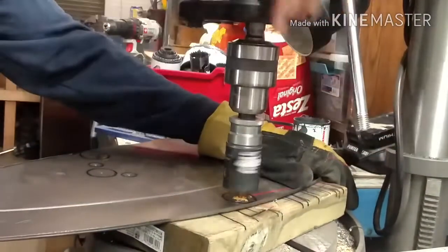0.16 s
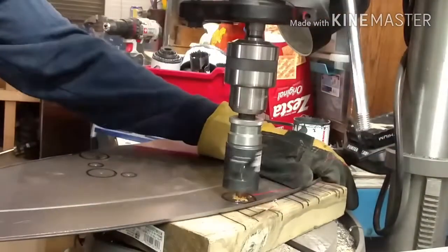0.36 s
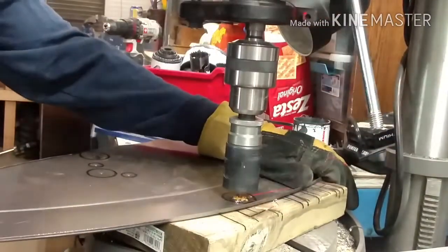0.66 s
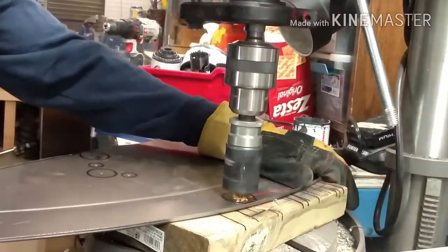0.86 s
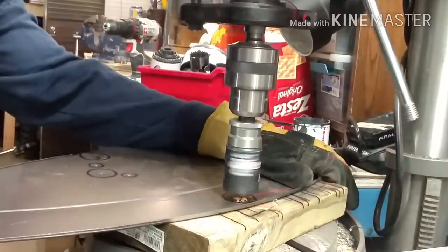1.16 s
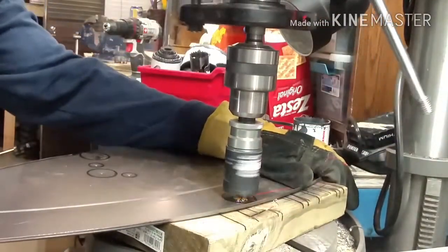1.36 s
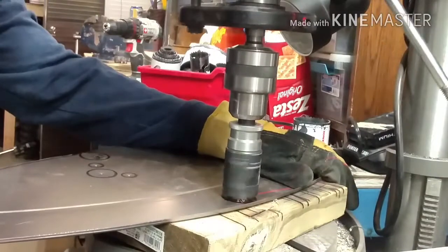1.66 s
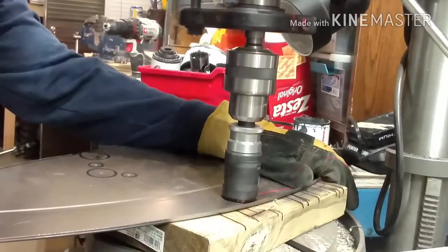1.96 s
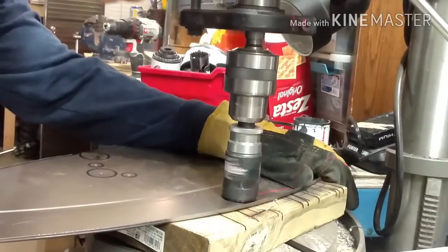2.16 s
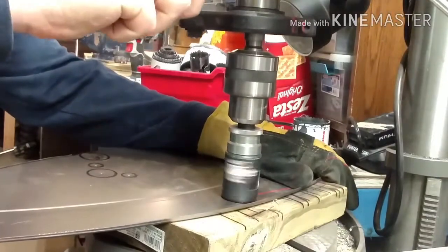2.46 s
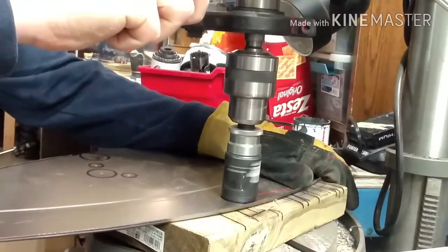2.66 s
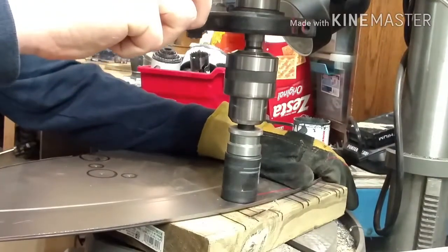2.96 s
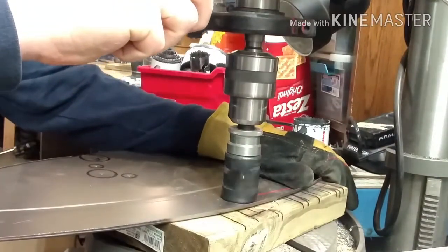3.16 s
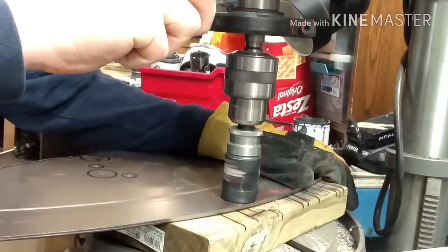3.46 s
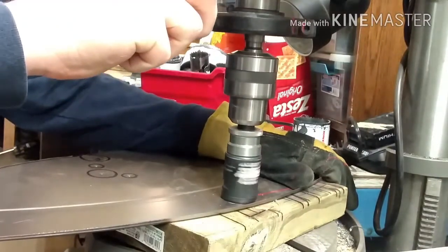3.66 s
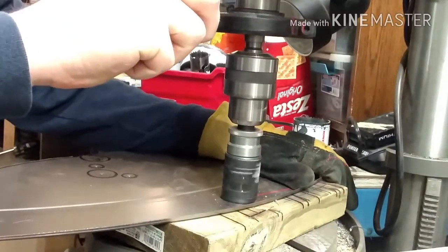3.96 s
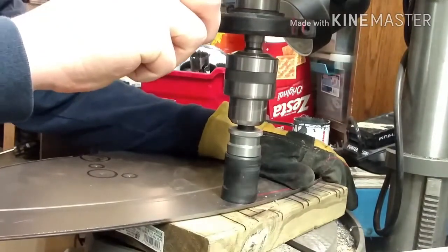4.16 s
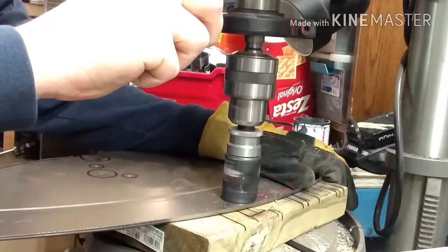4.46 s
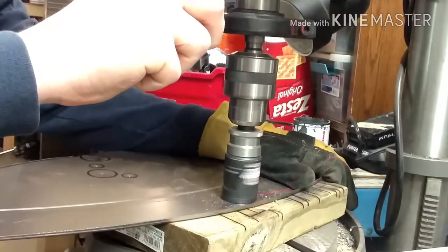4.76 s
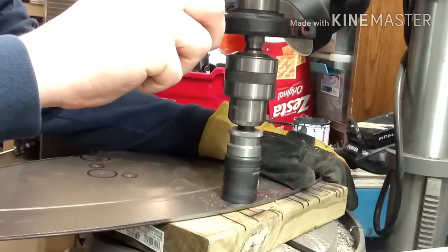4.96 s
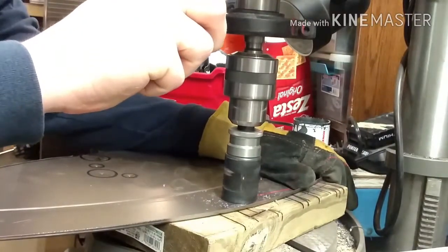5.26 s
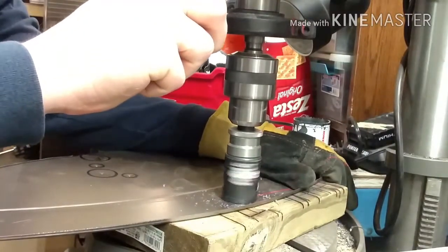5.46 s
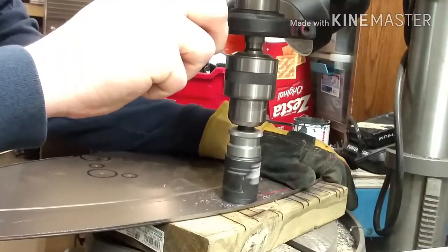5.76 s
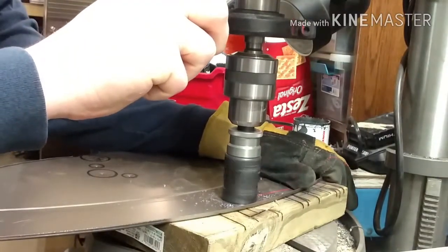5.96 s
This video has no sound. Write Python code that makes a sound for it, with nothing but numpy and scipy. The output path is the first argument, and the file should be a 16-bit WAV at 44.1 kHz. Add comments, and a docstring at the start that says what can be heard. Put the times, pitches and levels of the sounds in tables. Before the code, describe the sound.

Steady machine noise from start to end: a buzzing motor hum, the steel sheet rattling on its block, and irregular light knocks about thirty times a second, some harder. From around three seconds the teeth rub the steel with subtle rasps and tiny chip clicks. Soon after four seconds a tooth snags with a crisp metallic clack. Heard close on a phone in a small cluttered room.

```python
"""Small workshop: a drill press runs while a hole saw is fed onto a steel sheet, a phone close by.
Each motor turn shakes frame and sheet: a drone of shaft orders (sines) with loose clatter between (noise blows).
Slack drive parts chatter and tick in step with the turns: filtered noise bursts with short tails.
Saw teeth scrape and skid (noise strokes), chips snap, and once a tooth catches: a clack and a bright ring."""
import sys
import numpy as np
from scipy import signal
from scipy.fft import rfft, irfft
from scipy.io import wavfile
from scipy.ndimage import uniform_filter1d

SR = 44100
rng = np.random.default_rng(int(sys.argv[2]) if len(sys.argv) > 2 else 0)


def bounce(signal):
    """Save signal as a 16-bit WAV file at the path given by the first command-line argument."""
    frames = np.transpose(np.atleast_2d(signal))
    limited = np.clip(frames, -1, 1)
    pcm = np.round(limited * 32767).astype(np.int16)
    wavfile.write(sys.argv[1], SR, pcm)


N = 269451
TIME_S = np.arange(N) / SR
FREQ_HZ = np.maximum(np.arange(N + 1) * SR / (2 * N), 1)

# Shaft orders of the drone. Each row: multiple of the motor speed, relative level in dB with the
# sheet free, the same with it pinned.
ORDERS = [(2, -61.0, -63.0), (4, -49.5, -54.0), (5, -56.5, -56.0), (7, -44.5, -47.5), (9, -43.5, -42.5),
          (10, -35.5, -39.0), (11, -44.0, -43.0), (12, -46.0, -47.5), (13, -40.0, -43.5),
          (14, -41.5, -37.0), (15, -39.5, -43.5), (18, -41.5, -43.0), (19, -42.5, -41.5),
          (20, -38.0, -42.0), (21, -42.0, -48.5), (22, -39.5, -44.0), (23, -39.5, -40.5),
          (24, -41.5, -42.0), (25, -28.0, -34.0), (26, -32.5, -27.5), (27, -29.5, -33.5),
          (28, -38.5, -36.5), (29, -33.5, -29.0), (30, -37.0, -33.5), (31, -29.5, -29.0),
          (32, -36.5, -33.0), (33, -38.0, -38.5), (34, -42.5, -36.5), (35, -34.5, -42.0),
          (36, -29.0, -31.5), (37, -36.5, -38.0), (38, -37.0, -37.5), (39, -39.0, -42.0),
          (40, -39.5, -42.5), (41, -46.5, -45.5), (43, -40.5, -39.0), (44, -44.0, -44.5),
          (45, -44.0, -47.0), (46, -50.0, -51.0), (49, -51.0, -45.0)]
# Orders that swell with the slip beat. Each row: order, depth when free (0-1), depth when pinned (0-1),
# time of a crest in seconds.
ORDER_BEATS = [(4, 0.9, 0.05, 0.42), (14, 0.37, 0.32, 0.47), (15, 0.59, 0.59, 0.25), (20, 0.75, 0.45, 0.12),
               (22, 0.0, 0.9, 0.35), (23, 0.63, 0.12, 0.11), (25, 0.07, 0.66, 0.09), (27, 0.45, 0.0, 0.01),
               (30, 0.43, 0.11, 0.39), (31, 0.53, 0.02, 0.16), (32, 0.2, 0.24, 0.4), (33, 0.57, 0.36, 0.51),
               (34, 0.53, 0.0, 0.88), (36, 0.36, 0.37, 0.44), (37, 0.17, 0.44, 0.47),
               (39, 0.19, 0.36, 0.64), (43, 0.53, 0.16, 0.58)]
# Two orders on the frame's main resonance. Each row: time in seconds, 16th order in dB, 17th order in dB.
BOOM_LEVEL = [(0.0, -23.5, -34), (0.5, -19, -29.5), (0.8, -20.5, -27.5), (1.2, -21.7, -31.5),
              (2.0, -22, -26.5), (2.35, -20.7, -27.5), (2.67, -24, -27), (2.9, -22, -26), (3.3, -24.5, -24),
              (3.76, -22.7, -24.5), (4.25, -22, -22), (4.38, -29.5, -27.5), (4.66, -23, -35),
              (4.99, -26.5, -23.5), (5.16, -23.5, -23.5), (5.47, -26, -28.5), (5.75, -20, -28.5),
              (6.11, -25.5, -28.5)]
# Motor slows a little as the teeth take hold. Each row: time in seconds, loss of speed in turns per second.
SPEED_LOSS = [(0, -.018), (2.85, -.018), (3, .01), (3.55, .02), (3.95, .076), (4.15, .065), (4.3, .028),
              (4.45, .03), (4.8, -.022), (6.11, -.008)]
# Saw is fed down and pins the sheet. Each row: time in seconds, pressure (0-1).
PRESSURE = [(0, 0), (2.1, 0), (3.1, .9), (4.4, 1), (4.9, .7), (6.11, .65)]
# Shaking of the sheet, damped while the teeth bite hardest. Each row: time in seconds, relative level in dB.
SHEET_LEVEL = [(0, -20), (1.15, -20.5), (1.55, -22.5), (2.25, -21), (2.5, -21), (2.9, -20), (3.03, -20),
               (3.075, -23), (3.12, -21), (3.68, -19.5), (3.74, -24), (3.8, -21.5), (4.27, -19.5),
               (4.36, -22), (4.65, -21), (4.95, -20.5), (5.06, -17), (5.18, -20.5), (5.3, -19.5),
               (6.11, -21)]
# Broad response of the sheet. Each row: frequency in Hz, relative dB per Hz.
SHEET_RESPONSE = [(25, -37), (90, -29.5), (170, -14.5), (225, -11.5), (280, 0.5), (340, -6.5), (430, -3.5),
                  (500, 0), (550, -3.5), (700, -3), (800, 3.5), (1150, -3), (1420, -8.5), (1900, -37.5),
                  (4000, -88)]
# Resonances of frame and table in the clatter. Each row: centre in Hz, width in Hz, dB over the broad response.
FRAME_RING = [(205, 4, 11), (282, 14, 6), (485, 12, 9), (603, 7, 9)]
# Broad response of the drive. Each row: frequency in Hz, relative dB per Hz.
DRIVE_RESPONSE = [(1200, -8.5), (2600, -13), (3400, 5.5), (4200, -8.5), (5300, 2), (6300, -13.5),
                  (7500, -2.5), (9000, -6.5), (10200, -2.5), (11300, -3.5), (12800, -9.5), (15500, -10)]
# Resonances of chuck and pulleys. Each row: centre in Hz, width in Hz, dB over the broad response.
CHUCK_RING = [(2050, 48, 18), (2730, 180, 26.5), (3220, 50, 0.5), (3800, 260, 5), (4420, 260, 10),
              (4760, 190, 11), (5670, 270, 4), (6780, 120, 8), (8430, 1050, 5), (9370, 140, -2),
              (10700, 170, 8.5), (13900, 220, 6)]
# Narrow modes of saw and chuck. Each row: centre in Hz, width in Hz, dB over the broad response.
STEEL_MODES = [(3285, 22, 7), (3410, 25, 7), (3725, 25, 6), (3870, 30, 5), (3965, 22, 5), (4770, 30, 4),
               (6830, 30, 4), (8450, 30, 6), (8860, 40, 5), (9400, 30, 6)]
# Broad response of the scraping teeth. Each row: frequency in Hz, relative dB per Hz.
TEETH_RESPONSE = [(700, -16), (1400, -2.5), (1750, 3.5), (2000, -2), (2200, -3.5), (2500, -10.5), (3200, 1),
                  (4200, -35.5), (6500, -16), (15000, -63)]
# Rasp of the teeth. Each row: time in seconds, relative level in dB.
RASP_LEVEL = [(0, -40.5), (1.1, -41), (2.4, -44), (2.9, -39.5), (3.4, -44), (3.85, -42), (4.2, -43),
              (4.7, -43.5), (5.1, -40), (5.4, -39.5), (5.7, -43.5), (6.11, -44)]
# Saw resonances struck by chips. Each row: centre in Hz, width in Hz, relative peak gain in dB.
CHIP_RING = [(3000, 800, -2), (3800, 700, -3), (4400, 700, -3)]
# Hardest knocks of the slack drive. Each row: time in seconds, relative body level in dB, relative treble level in dB.
HARD_KNOCKS = [(0.027, -26.5, -32), (0.1608, -28, -28.5), (0.193, -30, -35), (0.295, -26.5, -37),
               (0.497, -24.5, -30), (0.5995, -26, -32), (0.665, -28, -34), (0.8322, -28, -34),
               (1.0015, -34, -36), (1.034, -28, -37), (1.1352, -22, -29), (1.2705, -37, -33.5),
               (1.3728, -37, -32), (1.4724, -34, -35), (1.574, -27.5, -28.5), (1.7415, -30, -35),
               (1.808, -26.5, -33), (1.9092, -25, -30.5), (1.944, -32, -32), (2.1116, -29, -33),
               (2.2118, -31, -38), (2.4134, -39, -30.5), (2.5144, -27, -29.5), (2.582, -30, -33),
               (2.615, -29, -38), (2.817, -27, -38), (3.053, -27, -35), (3.086, -27, -29.5),
               (3.221, -25.5, -31), (3.255, -24, -40), (3.3553, -31, -34), (3.524, -34, -38),
               (3.691, -21.5, -29), (3.928, -39, -38), (3.961, -33, -28), (4.0642, -29.5, -35),
               (4.131, -28, -34), (4.164, -24.5, -34), (4.1976, -25, -35), (4.2662, -26, -35),
               (4.534, -31, -34), (4.803, -40, -30), (4.838, -26, -39), (4.971, -29, -32),
               (5.106, -24.5, -34), (5.1404, -23, -37), (5.1726, -33, -29), (5.3418, -25, -28),
               (5.375, -24.5, -33), (5.477, -31, -28.5), (5.509, -29, -30), (5.644, -37, -37),
               (5.71, -27, -33), (5.7788, -29, -30), (5.845, -28, -34), (5.979, -36, -33.5),
               (6.0477, -24.5, -35)]
# Teeth skid on the steel. Each row: start in seconds, length in seconds, level in dB, centre in Hz.
SKIDS = [(2.85, .17, -38.5, 2450), (3.612, .05, -37, 1790), (4.205, .09, -36.5, 1790),
         (4.324, .085, -33.5, 1700), (4.42, .3, -37, 1620), (4.5, .04, -36, 1850),
         (4.665, .05, -36.5, 1720), (5.06, .1, -41, 2000)]
# A tooth catches. Each row: start in seconds, relative level in dB.
CATCHES = [(4.343, -21), (4.349, -24), (4.363, -29), (4.393, -35)]
# Modes of the saw cup. Each row: frequency in Hz, relative level in dB, 60 dB decay time in seconds.
CUP_MODES = [(1900, 7, .025), (3300, 6, .025), (4630, 6, .035), (4400, 5, .03), (6175, -12, .15),
             (8870, 1, .09), (9030, -1, .1), (11570, -18, .11), (12560, -11, .13)]
# Balance of the phone's two ports. Each row: frequency in Hz, left minus right in dB.
PORT_BALANCE = [(60, 3.5), (120, 4.5), (200, 3), (290, -2), (480, -4), (680, 2), (1290, -1), (2380, -7),
                (4400, -0.5), (8400, 10), (12000, 0.5)]

MOTOR_HZ, SPINDLE_HZ, BELT_HZ = 29.727, 6.195, 3.445  # nominal turns per second
SLIP_BEAT_HZ = 1.092  # motor slips against the mains: slow beat
SPINDLE_SLACK_S, BELT_SLACK_S = 0.027, 0.26  # a moment of most play
KNOCK_PHASE_TURNS, FRAME_SMEAR_TURNS = .78, .18  # place in the motor turn; scatter of frame orders
ORDER_WAVER, LOWER_WAVER, UPPER_WAVER = .18, .09, .24  # share: drone, 16th order, 17th order
DRONE_OFFSET_DB, CLATTER_OFFSET_DB, CLATTER_PINNED_DB = .5, -3.2, -.9
BUZZ_DB, FLUTTER_DB = 2.0, 1.1  # loose sheet: swell once a turn, random flutter
CHATTER_DB, CHATTER_LOAD_DB = -36.5, 0.6  # running free; rise at full pressure
RISE_S, CRACK_S, TOP_CRACK_S = .002, .0065, .009
BODY_TINT_HZ, TOP_TINT_HZ = (3100, 4900), (8000, 9800)  # range of each knock's own resonance
CROSS_LAG_SAMPLES, CROSS_SHARE = 17, .74  # phone's stereo widening
TOP_HZ = 15300


def undb(db):
    """Decibels to gain."""
    return 10 ** (np.asarray(db) / 20)


def unit(x):
    """Scale to rms 1."""
    return x / np.sqrt(np.mean(np.abs(x) ** 2))


def curves(table):
    """Each column of a table as a line through time."""
    time_s, *columns = np.transpose(table)
    return [np.interp(TIME_S, time_s, column) for column in columns]


def shape(points):
    """Response in dB: points joined on a log-frequency axis."""
    hz, db = np.transpose(points)
    return np.interp(np.log(FREQ_HZ), np.log(hz), db)


def peaks(table):
    """Resonances as dB over a broad response."""
    return sum(peak_db / (1 + (2 * (FREQ_HZ - hz) / width_hz) ** 2) for hz, width_hz, peak_db in table)


def colour(x, db):
    """Causal minimum-phase filter with the given gain at each frequency, by folding the cepstrum."""
    cepstrum = irfft(np.log(undb(db)))
    cepstrum[1:N] *= 2
    cepstrum[N + 1:] = 0
    response = np.exp(rfft(cepstrum))
    return irfft(rfft(x, 2 * N) * response)[..., :N]


def walk(rate_hz):
    """Smooth chance at rms 1, with about rate_hz new values a second."""
    knots = rng.standard_normal(int(N / SR * rate_hz) + 3)
    line = np.interp(TIME_S * rate_hz + rng.random(), np.arange(len(knots)), knots)
    return unit(uniform_filter1d(line, int(SR / rate_hz / 2)))


def spread(mid, side):
    """Left and right from mid and side."""
    return np.array([mid + side, mid - side])


def cycle(hz, crest_s):
    """Steady swing between -1 and 1."""
    return np.cos(2 * np.pi * hz * (TIME_S - crest_s))


def slip_beat(depth, crest_s):
    """Gain of two close tones that beat: broad crests and narrow dips."""
    return np.sqrt(1 + 2 * depth * cycle(SLIP_BEAT_HZ, crest_s) / (1 + depth ** 2))


def throb(turns, db, crest_turns):
    """Gain that swells once a motor turn, as the unbalance loads the cut."""
    return unit(undb(db * np.cos(2 * np.pi * (turns - crest_turns))))


def partial(turns, order, waver, waver_hz, side=0.4):
    """Shaft order, mid at rms 1, wavering in size and phase; low orders differ most between channels."""
    angle = 2 * np.pi * order * turns
    sine, cosine = np.sin(angle), np.cos(angle)
    tone = sine * (1 + waver * walk(waver_hz)) + cosine * waver * walk(waver_hz)
    tone /= np.sqrt(.5 + waver ** 2)
    return spread(tone, side * (.5 + 7 / order) * (-1) ** order * cosine)


def drone(turns, shake_db, pressure, waver_hz=11):
    """Low orders sound in the frame, upper ones whine in the sheet; pinning shifts them, some beat with the mains."""
    beat = {order: slip_beat(free + (pinned - free) * pressure, crest_s)
            for order, free, pinned, crest_s in ORDER_BEATS}
    flutter = unit(undb(FLUTTER_DB * (walk(16) + walk(110))))
    buzz = throb(turns, db=BUZZ_DB, crest_turns=0.61) * flutter
    out = np.zeros((2, N))
    for order, free_db, pinned_db in ORDERS:
        in_sheet = order > 22
        level_db = DRONE_OFFSET_DB + free_db + (pinned_db - free_db) * pressure
        gain = beat.get(order, 1)
        smear_turns = FRAME_SMEAR_TURNS
        if in_sheet:
            level_db = level_db + shake_db - shake_db.mean()
            gain = gain * buzz
            smear_turns = 1
        # one shove a turn keeps frame orders roughly in step; the sheet scatters the rest
        scatter = smear_turns * rng.standard_normal()
        shifted = turns - KNOCK_PHASE_TURNS + scatter / order
        out += undb(level_db) * gain * partial(shifted, order, ORDER_WAVER, waver_hz)
    return out


def boom(turns, waver_hz=16, crest_turns=.55):
    """Two orders on the frame's main resonance beat once a turn, each with its own level curve."""
    lower_db, upper_db = curves(BOOM_LEVEL)
    lower = partial(turns - crest_turns, order=16, waver=LOWER_WAVER, waver_hz=waver_hz)
    upper = partial(turns - crest_turns, order=17, waver=UPPER_WAVER, waver_hz=waver_hz)
    return undb(lower_db) * lower + undb(upper_db) * upper


def strokes(turns, count, fade, scatter_db):
    """Envelope of count uneven blows a turn; fade is the decay constant as a share of the slot."""
    slot = turns * count + 1
    size = undb(scatter_db * rng.standard_normal(int(slot.max()) + 1))
    return unit(size[slot.astype(int)] * np.exp(-(slot % 1) / fade))


def clatter(turns, shake_db, side=0.35, wide_hz=250, repeat=.17):
    """Sheet slaps on its block six times a turn, each turn partly like the last; the rumble is widest."""
    slaps = strokes(turns, count=6, fade=1.0, scatter_db=3.0) * rng.standard_normal((2, N))
    slaps = slaps + repeat * np.roll(slaps, round(SR / MOTOR_HZ), axis=1)
    mid = colour(slaps[0], shape(SHEET_RESPONSE) + peaks(FRAME_RING))
    wide = colour(slaps[1], shape(SHEET_RESPONSE) + 10 * np.log10(1 + (wide_hz / FREQ_HZ) ** 2))
    return undb(CLATTER_OFFSET_DB + shake_db) * spread(unit(mid), side * unit(wide))


def dense_modes(x, ring_s=0.0049, room_s=0.018, room_db=-7):
    """Countless small modes of the steel smear each impulse; the workshop answers: decaying noise."""
    age_s = TIME_S[:SR // 4]
    ring, room = np.exp(-age_s / ring_s), np.exp(-age_s / room_s)
    response = (unit(ring) + undb(room_db) * unit(room)) * rng.standard_normal((2, len(age_s)))
    return signal.fftconvolve(x, unit(response) / np.sqrt(len(age_s)), axes=1)[:, :N]


def steel():
    """Response of the drive's steel parts in dB, at unit power."""
    db = shape(DRIVE_RESPONSE) + peaks(CHUCK_RING) + peaks(STEEL_MODES)
    return db - 10 * np.log10(np.mean(undb(db) ** 2))


def slackness(spindle_db=1.0, belt_db=1.0):
    """Play in the drive in dB: opens and closes with each turn of spindle and belt."""
    return spindle_db * cycle(SPINDLE_HZ, SPINDLE_SLACK_S) + belt_db * cycle(BELT_HZ, BELT_SLACK_S)


def chatter(turns, chatter_db, patchy_db=0.5, side=1.0, dull_hz=8000):
    """Play in the drive: fine grit in patches, duller than the knocks, spread wide by the walls."""
    grit = strokes(turns, count=19, fade=0.4, scatter_db=1.0) * undb(patchy_db * walk(13.0))
    force = grit * rng.standard_normal((2, N))
    dulling_db = 10 * np.log10(1 + (FREQ_HZ / dull_hz) ** 4)
    mid, wide = dense_modes(colour(force, steel() - dulling_db))
    return undb(chatter_db) * spread(mid, side * wide) / np.hypot(1, side)


def scrape(turns, scrape_db, offset_db=3):
    """Teeth rub the steel in short uneven strokes of noise."""
    rub = strokes(turns, count=7, fade=0.62, scatter_db=2.0) * rng.standard_normal((2, N))
    return undb(scrape_db + offset_db) * unit(dense_modes(colour(rub, shape(TEETH_RESPONSE))))


def chips(db=-48, side=0.3, per_s=450, scatter_db=3.0):
    """Grit snaps under the teeth: fine, irregular clicks that ring the saw very briefly."""
    size = undb(scatter_db * np.minimum(rng.exponential(size=N), 3))
    snaps = (rng.random(N) < per_s / SR) * size * rng.standard_normal((2, N)).clip(-1, 1)
    response = sum(undb(peak_db) / (1 + (2 * (FREQ_HZ - hz) / width_hz) ** 2)
                   for hz, width_hz, peak_db in CHIP_RING)
    ringing = colour(snaps, 20 * np.log10(response))
    mid, wide = dense_modes(ringing, ring_s=.0012, room_s=.02, room_db=-12)
    return undb(db) * spread(unit(mid), side * unit(wide))


def knocks(slack_db, body_db=-44, body_scatter_db=3.5, treble_db=-44, treble_scatter_db=4.0):
    """Light knock on each motor turn without a hard one, stronger with more play; rows as HARD_KNOCKS."""
    time_s = (np.arange(int(N / SR * MOTOR_HZ)) + KNOCK_PHASE_TURNS) / MOTOR_HZ
    body_size, treble_size = np.clip(rng.standard_normal((len(time_s), 2)).T, -1.5, 1.5)
    play_db = np.interp(time_s, TIME_S, slack_db)
    gap_s = np.abs(time_s[:, None] - np.array(HARD_KNOCKS)[:, 0]).min(axis=1)
    rows = np.column_stack([time_s, body_db + play_db + body_scatter_db * body_size,
                            treble_db + play_db + treble_scatter_db * treble_size])
    return rows[gap_s > .5 / MOTOR_HZ]


def tinted(hz_range, size, sharpness=5, lift=1.6):
    """Noise at rms 1 with one resonance at a random place in the range; sharpness is its Q."""
    noise = rng.standard_normal((2, size))
    b, a = signal.iirpeak(rng.uniform(*hz_range), sharpness, fs=SR)
    return unit(noise + lift * signal.lfilter(b, a, noise))


def ticks(rows, body_gain_db=-3.0, top_gain_db=-4.0, ring_s=0.057, ring_db=-13,
          top_ring_s=0.058, top_ring_db=-3.0, split_hz=6500):
    """Knock: short crack of its own colour, then steel and room ring on, strongest in the treble."""
    body, top = np.zeros((2, 2, N))
    age_s = TIME_S[:SR // 4]
    contact = 1 - np.exp(-age_s / RISE_S)
    body_decay = contact * (np.exp(-age_s / CRACK_S) + undb(ring_db) * np.exp(-age_s / ring_s))
    top_decay = contact * (np.exp(-age_s / TOP_CRACK_S) + undb(top_ring_db) * np.exp(-age_s / top_ring_s))
    for time_s, body_db, treble_db in rows:
        i = int((time_s - RISE_S) * SR)
        body_burst = undb(body_db + body_gain_db) * body_decay * tinted(BODY_TINT_HZ, len(age_s))
        top_burst = undb(treble_db + top_gain_db) * top_decay * tinted(TOP_TINT_HZ, len(age_s))
        body[:, i:i + len(age_s)] += body_burst[:, :N - i]
        top[:, i:i + len(age_s)] += top_burst[:, :N - i]
    low = signal.sosfilt(signal.butter(6, split_hz, fs=SR, output="sos"), body)
    high = signal.sosfilt(signal.butter(2, split_hz, "high", fs=SR, output="sos"), top)
    return colour(low + high, steel())


def skids(turns):
    """Brief band-limited rasps where the teeth drag harder."""
    out = np.zeros((2, N))
    rasp = strokes(turns, count=5, fade=1.0, scatter_db=2.0) * rng.standard_normal((2, N))
    for start_s, length_s, db, hz in SKIDS:
        band = signal.butter(2, [hz / 1.5, hz * 1.2], "band", fs=SR, output="sos")
        swell = np.sin(np.pi * np.clip((TIME_S - start_s) / length_s, 0, 1))
        out += undb(db) * swell * unit(signal.sosfilt(band, rasp))
    return out


def catches(crack_s=0.0018, tail_db=-12, tail_s=0.074, ring_db=-12):
    """Tooth snags the edge of the cut: a clack with a rustling tail, and the saw cup rings."""
    out = np.zeros((2, N))
    age_s = TIME_S[:SR // 4]
    clack = np.exp(-age_s / crack_s) + undb(tail_db) * np.exp(-age_s / tail_s)
    for start_s, db in CATCHES:
        ring = sum(undb(mode_db - 60 * age_s / t60_s)
                   * np.sin(2 * np.pi * (hz * age_s + rng.random((2, 1))))
                   for hz, mode_db, t60_s in CUP_MODES)
        rustle = unit(undb(3 * walk(120)[:len(age_s)]))
        noise = rustle * clack * rng.standard_normal((2, len(age_s)))
        i = int(start_s * SR)
        out[:, i:i + len(age_s)] += undb(db) * (undb(ring_db) * ring + noise)
    return signal.sosfilt(signal.butter(2, [1100, 12000], "band", fs=SR, output="sos"), out)


def scene(slack_share=0.61):
    """One motor shaft times the turning layers; the belt makes its speed waver a little."""
    turns = np.cumsum(MOTOR_HZ - curves(SPEED_LOSS)[0]) / SR
    turns = turns + .0015 * walk(2.5) + .0014 * walk(14)
    pressure = curves(PRESSURE)[0]
    shake_db = curves(SHEET_LEVEL)[0]
    slack_db = slackness()

    machine = drone(turns, shake_db, pressure) + boom(turns)
    machine += clatter(turns, shake_db + CLATTER_PINNED_DB * pressure)

    chatter_db = CHATTER_DB + CHATTER_LOAD_DB * pressure + slack_share * slack_db
    drive = chatter(turns, chatter_db) + ticks([*HARD_KNOCKS, *knocks(slack_db)])

    rubbing = scrape(turns, curves(RASP_LEVEL)[0]) + skids(turns)
    saw = throb(turns, db=0.5, crest_turns=0.48) * rubbing + chips() + catches()
    return machine + drive + saw


def record(dry, cross_hz=1750):
    """Phone widens the treble by subtracting the other channel, delayed, and cuts the top."""
    ports = rfft(dry, 2 * N) * undb(np.array([[.5], [-.5]]) * shape(PORT_BALANCE))
    share = CROSS_SHARE / (1 + (cross_hz / FREQ_HZ) ** 6)
    delay = np.exp(-2j * np.pi * FREQ_HZ * CROSS_LAG_SAMPLES / SR)
    wide = (ports - share * delay * ports[::-1]) / np.hypot(1, share)
    low_pass = signal.ellip(8, .2, 80, TOP_HZ, fs=SR, output="sos")
    return signal.sosfilt(low_pass, irfft(wide)[:, :N])


dry = scene()
out = record(dry)
bounce(out)
```